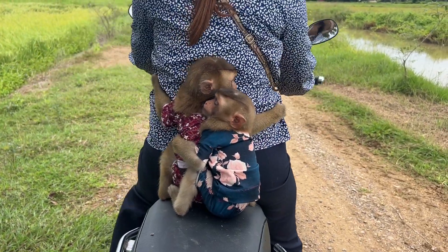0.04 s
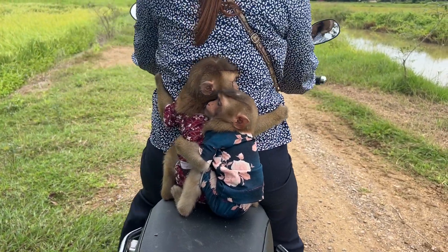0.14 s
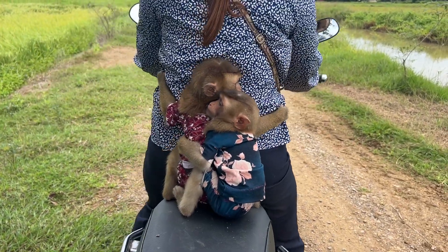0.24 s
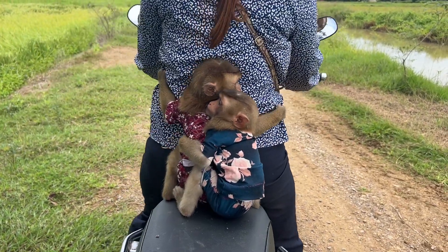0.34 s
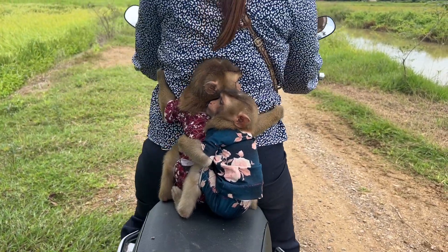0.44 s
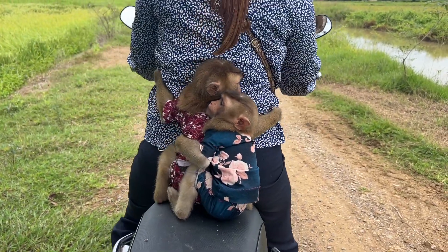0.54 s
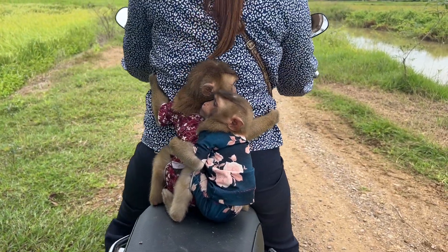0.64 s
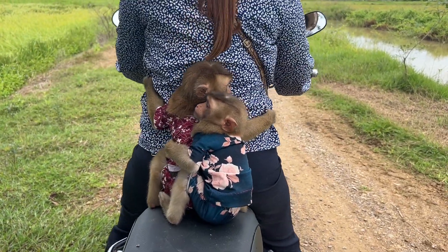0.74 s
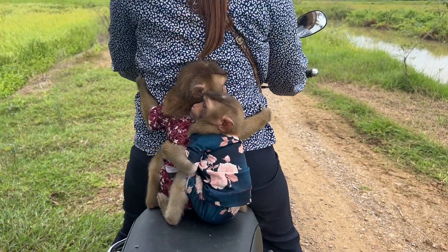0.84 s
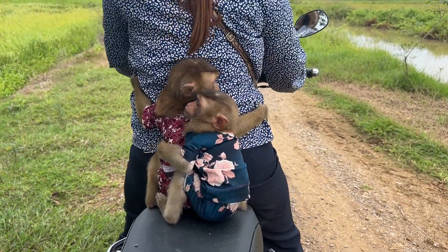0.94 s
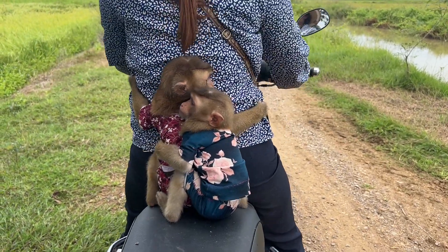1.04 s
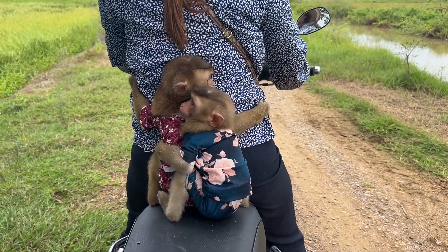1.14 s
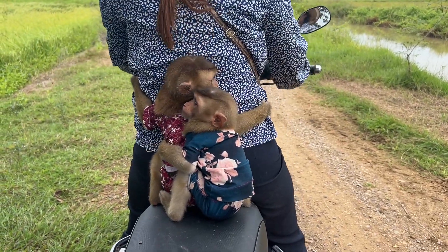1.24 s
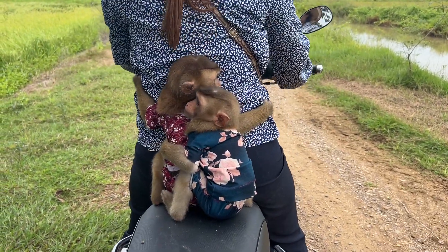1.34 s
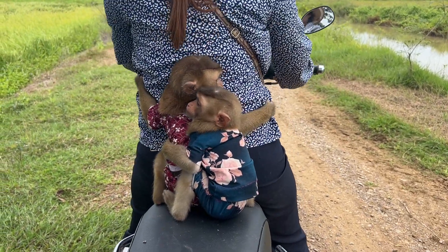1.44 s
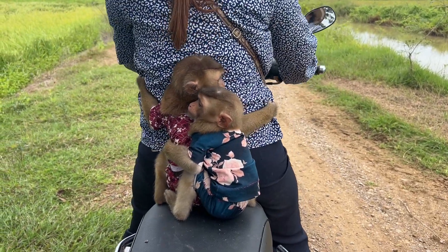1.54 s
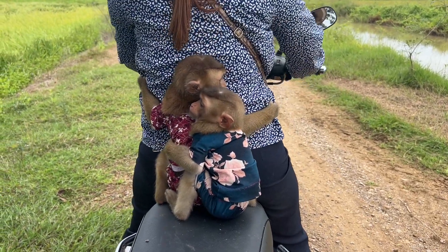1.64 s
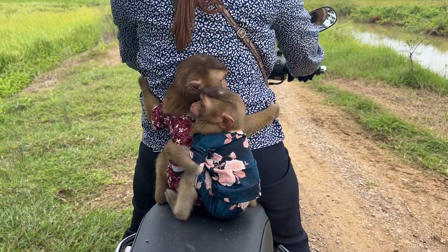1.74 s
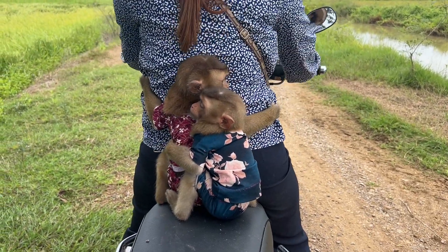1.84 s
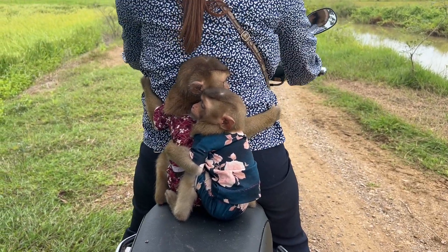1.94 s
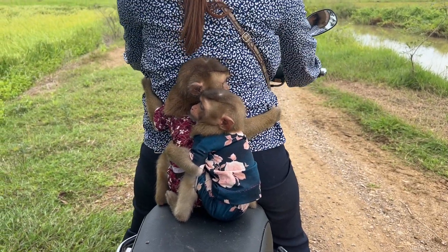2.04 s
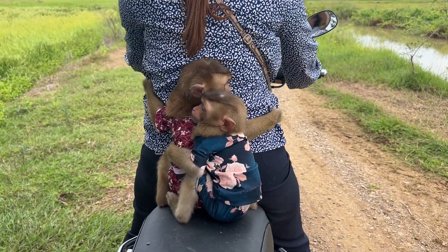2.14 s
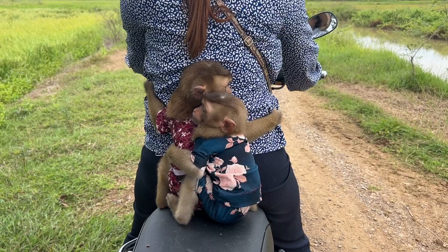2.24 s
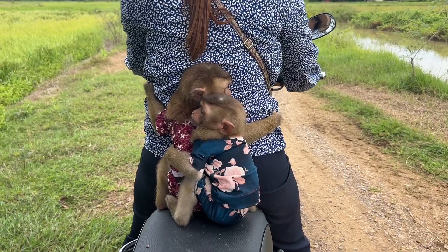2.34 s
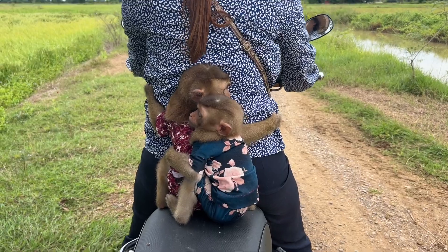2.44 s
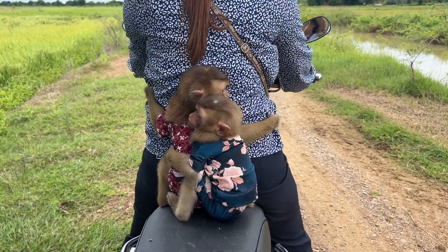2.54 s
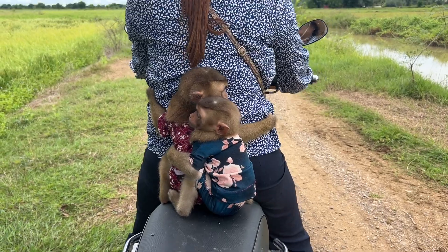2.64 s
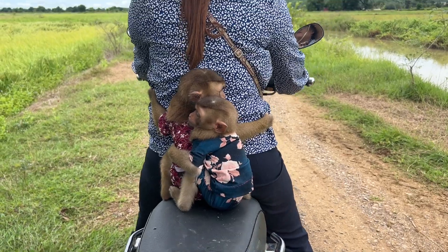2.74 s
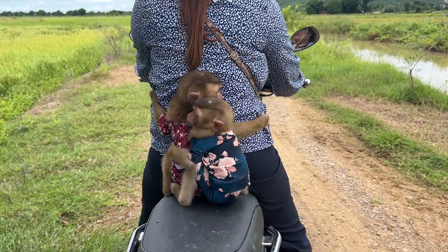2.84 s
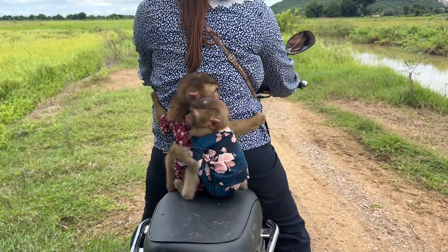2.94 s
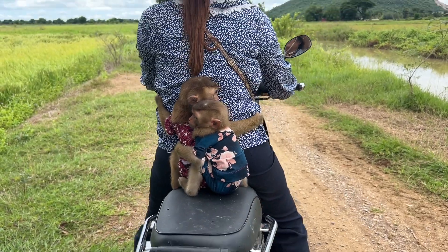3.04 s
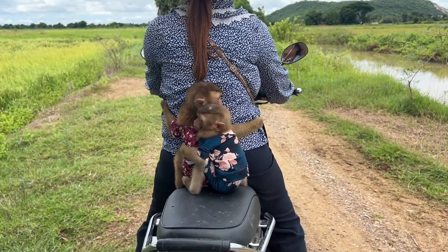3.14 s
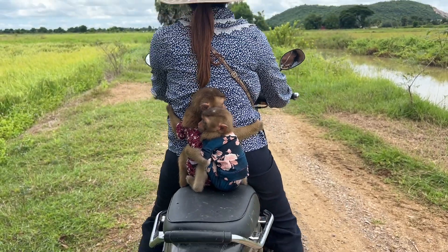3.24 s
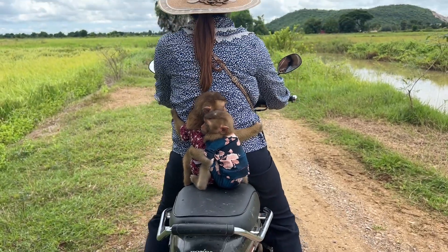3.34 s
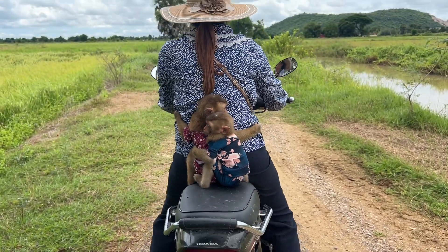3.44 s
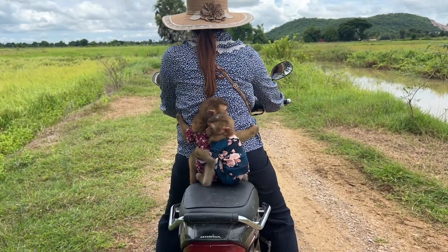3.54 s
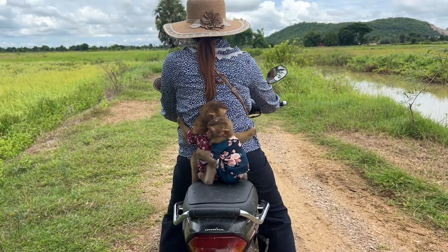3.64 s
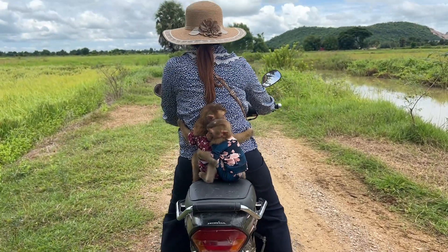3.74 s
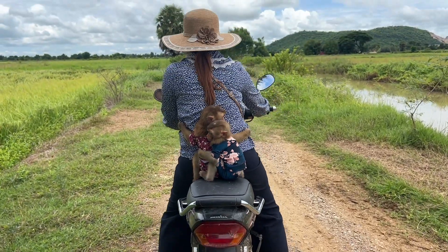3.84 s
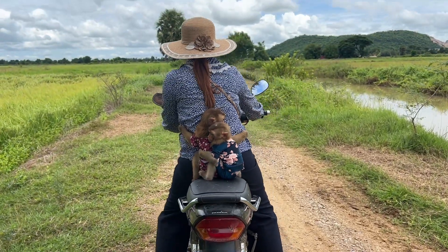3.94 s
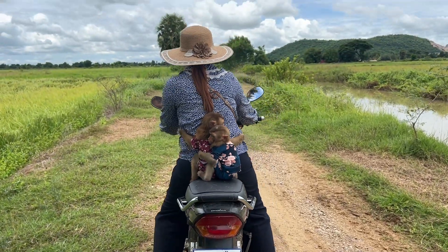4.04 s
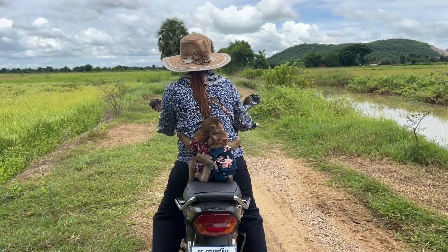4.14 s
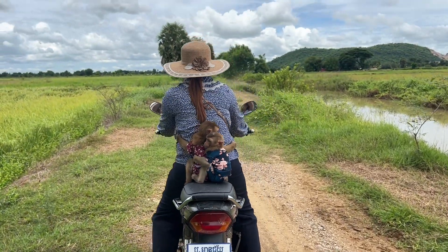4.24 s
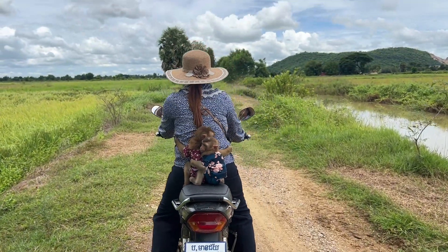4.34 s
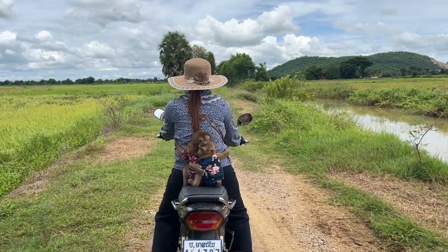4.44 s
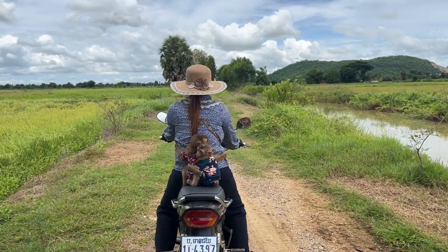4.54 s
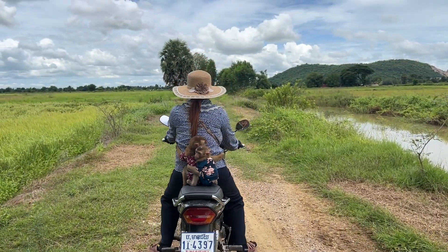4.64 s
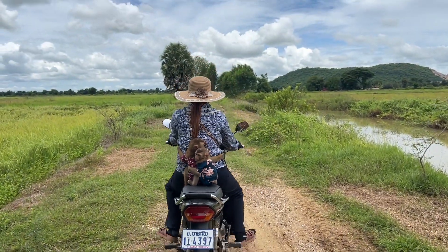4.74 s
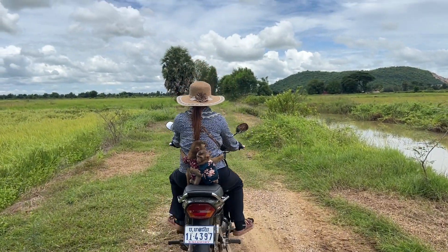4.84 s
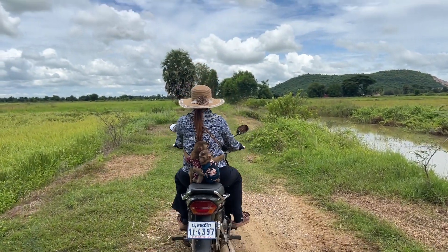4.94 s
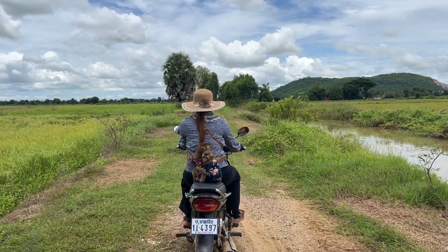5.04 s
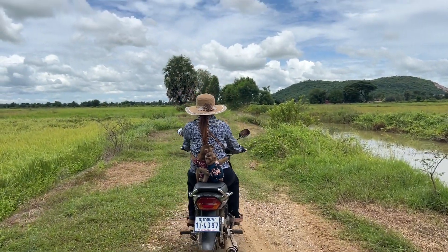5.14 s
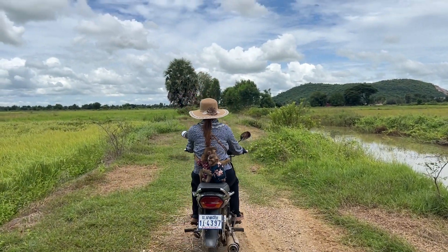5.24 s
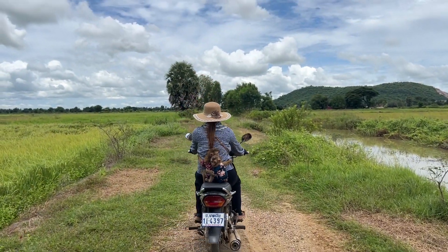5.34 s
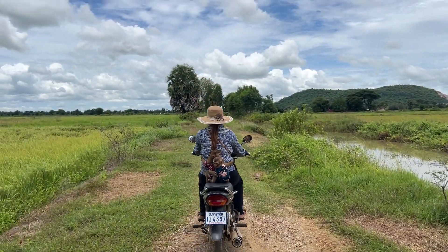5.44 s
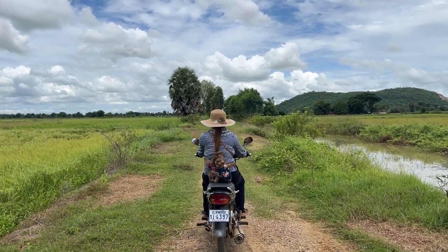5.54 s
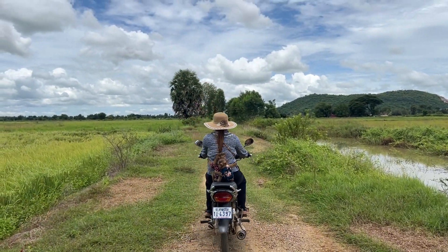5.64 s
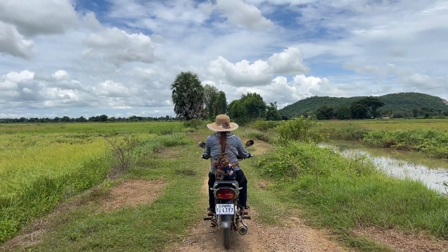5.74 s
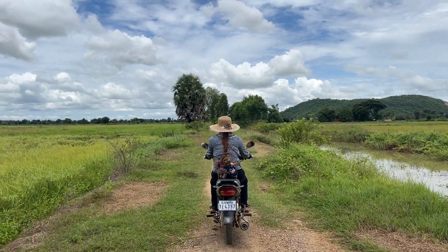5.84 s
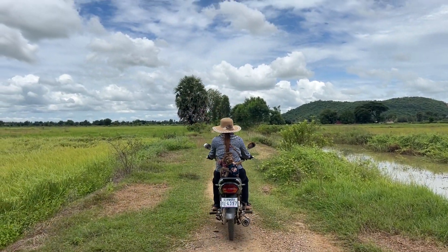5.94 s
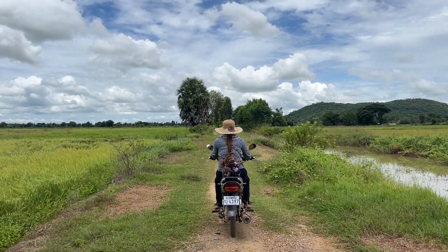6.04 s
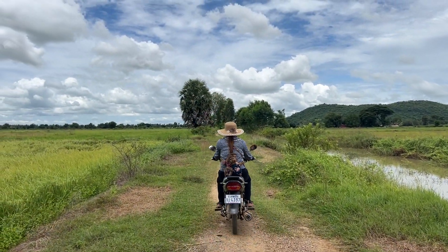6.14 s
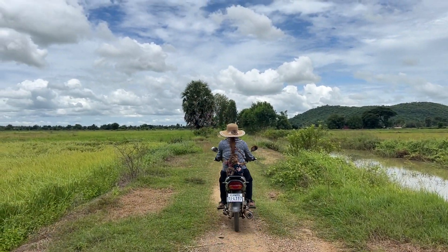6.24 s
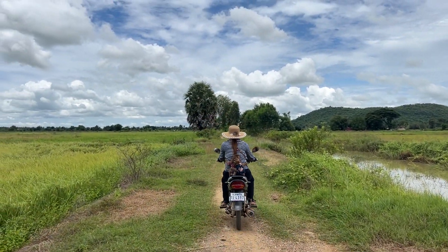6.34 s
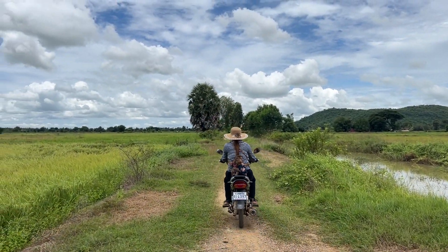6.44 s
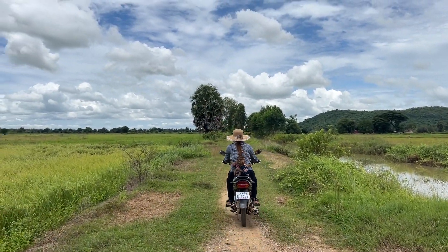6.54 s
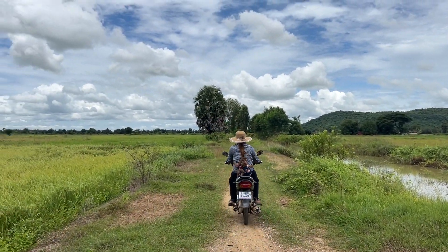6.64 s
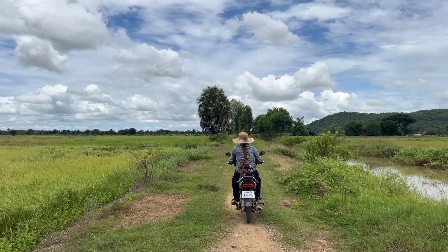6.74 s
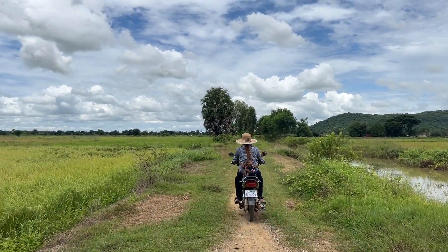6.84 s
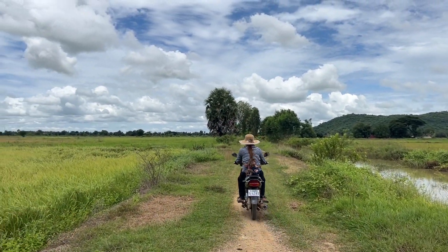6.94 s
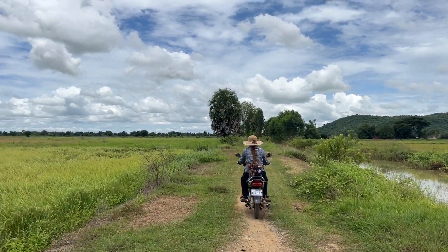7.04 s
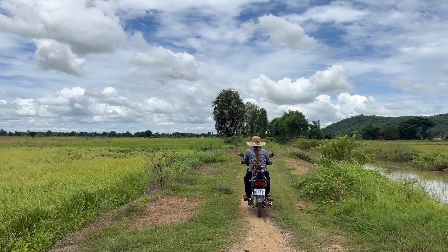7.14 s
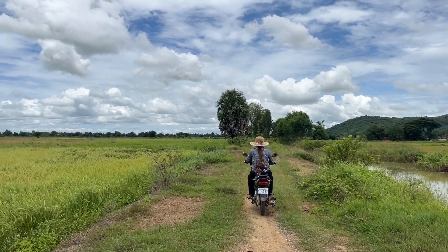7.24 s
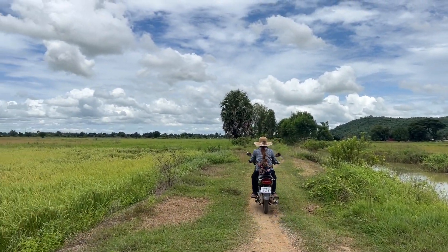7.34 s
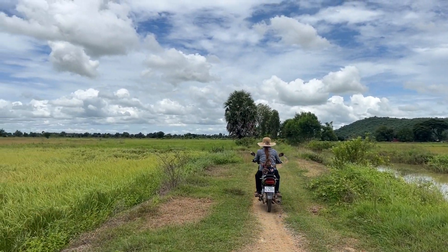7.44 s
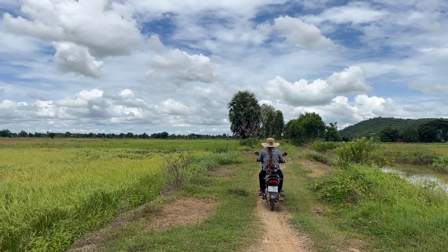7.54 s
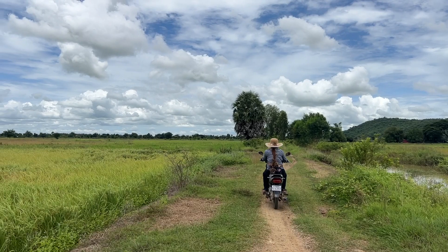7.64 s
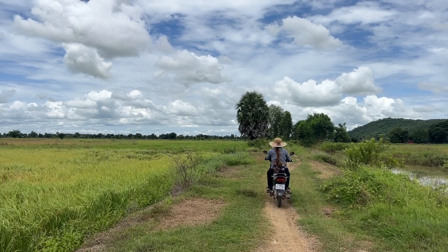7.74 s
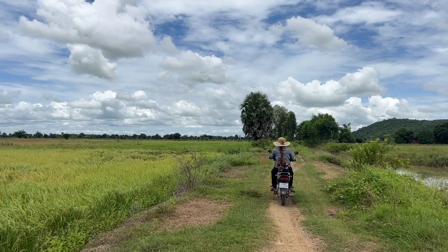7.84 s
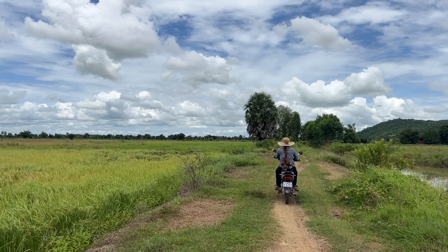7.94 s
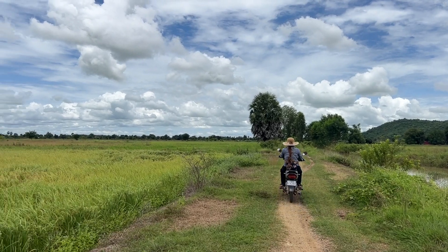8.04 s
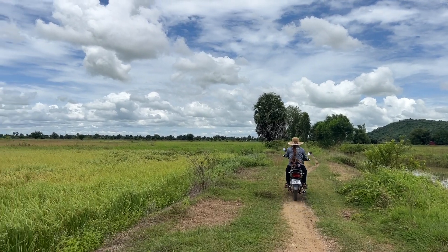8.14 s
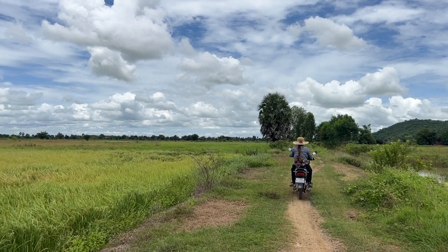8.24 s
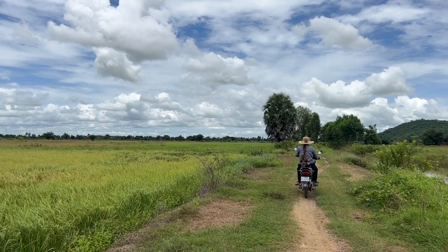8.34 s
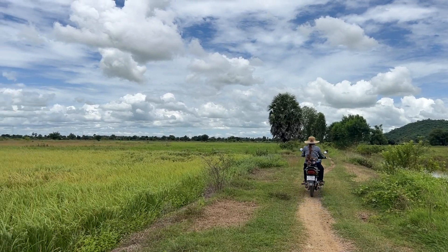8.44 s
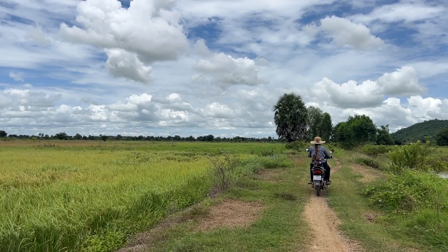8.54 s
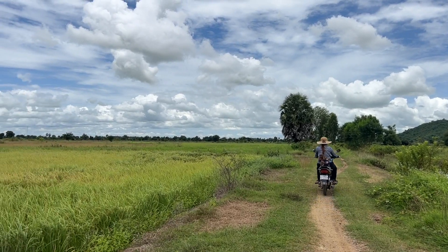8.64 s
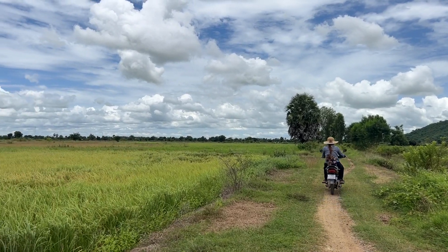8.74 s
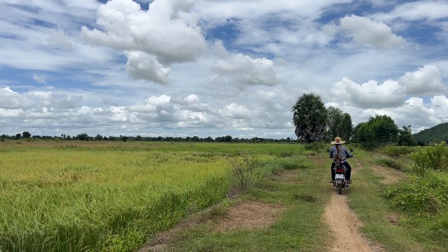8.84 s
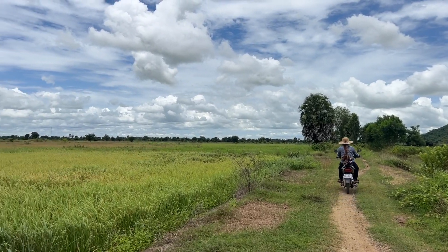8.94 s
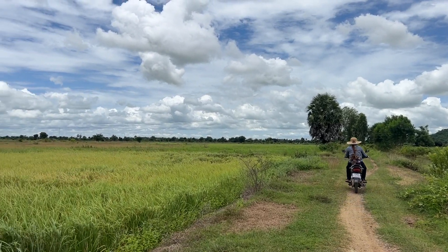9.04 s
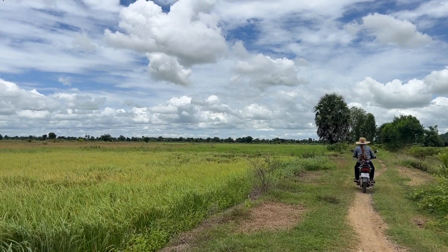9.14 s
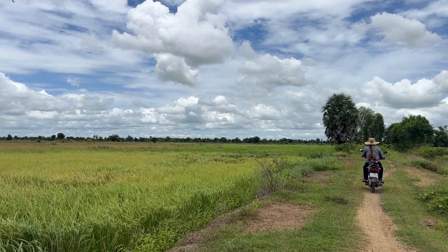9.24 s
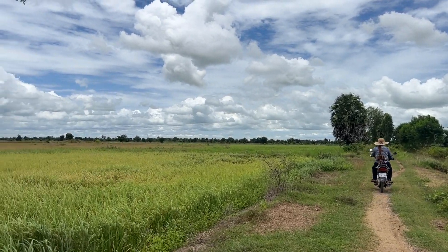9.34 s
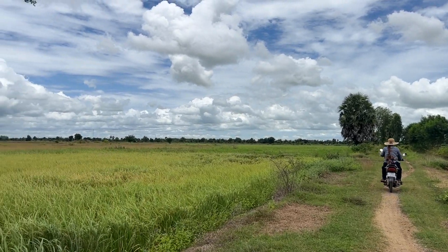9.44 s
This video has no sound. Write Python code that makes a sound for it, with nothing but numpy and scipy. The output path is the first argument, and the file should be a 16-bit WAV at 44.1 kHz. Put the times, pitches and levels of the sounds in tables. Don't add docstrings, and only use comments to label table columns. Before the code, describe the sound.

A rider shifts and knocks metal levers and stand, the seat creaks, and an electric starter grinds briefly. A small engine fires slowly, then speeds into a steady, low, rapid putter. Tyres crunch away over grit with ticks and clinks, the exhaust growing softer, duller and irregular as the throttle closes. Outdoors, dry and open without reverberation; a fixed microphone picks up low wind gusts, tiny high bird chips and a late muffled pop.

```python
import sys
import numpy as np
from scipy import signal
from scipy.fft import rfft, irfft, next_fast_len
from scipy.io import wavfile
from scipy.ndimage import uniform_filter1d

SR = 44100
rng = np.random.default_rng(int(sys.argv[2]) if len(sys.argv) > 2 else 0)


def nominal_scale(level):
    x = np.asarray(level, float) / 20
    return 10 ** x


def dump_mix(stems):
    frames = np.atleast_2d(stems).T
    limited = np.clip(frames, -1, 1)
    pcm = np.round(limited * 32767).astype(np.int16)
    wavfile.write(sys.argv[1], SR, pcm)


N = 418950
SECONDS = np.arange(N) / SR
SIZE = next_fast_len(N)
HZ = np.maximum(np.arange(SIZE // 2 + 1) * SR / SIZE, 1)

MISFIRES = [66, 68, 71, 76, 82, 108, 114, 118]
MISFIRE_LATE_S = .019
TIGHT_MS = 60


def rms_one(x):
    return x / np.sqrt(np.mean(x ** 2) + 1e-20)


def in_time(rows):
    s, *columns = np.transpose(rows)
    return [np.interp(SECONDS, s, c) for c in columns]


def during(rows):
    start, end = rows[0][0], rows[-1][0]
    return np.interp(SECONDS, [start, start + .008, end - .008, end], [0, 1, 1, 0])


def humps(rows):
    return sum(nominal_scale(db) * np.exp(-((SECONDS - s) / width) ** 2) for s, width, db in rows)


def at_hz(points):
    p = np.array(points, float)
    return np.interp(np.log(HZ), np.log(np.maximum(p[:, 0], 1)), p[:, 1])


def noise(spectrum, resonances=()):
    gain = 1 + sum(nominal_scale(db) / (1 + ((HZ - hz) / (width_hz / 2)) ** 2) for hz, width_hz, db in resonances)
    return rms_one(irfft(rfft(rng.standard_normal(SIZE)) * nominal_scale(at_hz(spectrum)) * gain, SIZE)[:N])


def drift(rate):
    r = np.exp(-2 * np.pi * rate / SR)
    return rms_one(signal.lfilter([1], [1, -2 * r, r * r], rng.standard_normal(N + SR))[SR:])


def split(x, hz):
    low = signal.sosfilt(signal.butter(1, hz, fs=SR, output="sos"), x)
    return low, x - low


def fields():
    # frequency in Hz, level in dB per Hz.
    colour = [(35, -36), (60, 17), (262, -2), (503, -15), (842, -20), (4120, -15), (10300, -61),
              (16000, -68)]
    return nominal_scale(-65) * (noise(colour) + 0.88 * noise(colour) * [[1], [-1]])


def wind():
    # time in s, level in dB.
    gusts = [(1.2, -60), (4.5, -40), (5.6, -46), (6.5, -46), (6.64, -42), (6.85, -47), (7.3, -52),
             (7.36, -36), (7.42, -48), (8.4, -52), (8.52, -41), (8.65, -53), (9.5, -60)]
    gust_db, = in_time(gusts)
    rumble = noise([(15, -46.0), (35, 3.0), (85, 2.0), (250, -10.5), (16000, -99)])
    return during(gusts) * nominal_scale(gust_db + 2.0 * drift(0.56)) * rumble


def birds():
    # time in s, peak in dB, frequency in Hz.
    chips = [
        (6.4457, -63, 7300),
        (6.5181, -62, 7400),
        (7.0694, -71, 7720),
        (7.9264, -81, 7540),
        (7.9833, -68, 7560),
        (8.647, -61, 7200),
        (8.7181, -58, 7200),
    ]
    out, t = np.zeros(N), np.arange(SR // 70) / SR
    for s, db, hz in chips:
        i = round((s - .004) * SR)
        whistle = np.sin(2 * np.pi * hz * (1.07 * t + .0007 * np.exp(-t / .004)))
        out[i:i + len(t)] += nominal_scale(db) * np.hanning(len(t)) * whistle
    return out


def grit():
    # time in s, level in dB.
    gravel = [(2.8, -69), (3.3, -56.5), (3.6, -60), (3.75, -57), (4.1, -62), (4.5, -62), (4.7, -63),
              (4.95, -61), (5.6, -68), (6.4, -75)]
    # time in s, peak in dB.
    ticks = [(2.2767, -47), (2.9412, -38), (3.2036, -52), (3.457, -42), (3.4624, -44), (3.9454, -33.5),
             (3.9549, -37), (4.2924, -38), (4.384, -41), (4.4836, -38), (4.5025, -36), (4.862, -38),
             (6.2233, -47), (6.2954, -61), (6.8578, -63), (6.8793, -61), (6.9486, -67), (6.989, -62),
             (7.0559, -55), (8.3419, -56), (8.63, -58), (8.7011, -58), (8.7585, -65), (9.1127, -62),
             (9.4195, -67)]
    grains_per_s, grain_t60_s = 610, 0.014
    gravel_db, = in_time(gravel)
    sizes = nominal_scale(2.5 * np.minimum(rng.exponential(1, N), 4))
    grains = rms_one(sizes * (rng.random(N) < grains_per_s / SR))
    marks = during(gravel) * nominal_scale(gravel_db) * grains / 12
    s, db = np.transpose(ticks)
    marks[(s * SR).astype(int)] += nominal_scale(db - 5.5)
    burst = signal.lfilter([1], [1, -nominal_scale(-60 / (grain_t60_s * SR))], marks)
    return burst * noise([(1500, -16), (4000, 2.5), (8000, -6.0), (12000, -5.5), (16000, -8.0)])


def strike(out, s, db, hz, edge_db, pan_db, t60, crunch, squeak):
    t, chance = np.arange(SR // 20) / SR, rng.standard_normal((2, SR // 20))
    body = signal.sosfilt(signal.butter(4, [550, 2400], "band", fs=SR, output="sos"), chance[0])
    edge = signal.sosfilt(signal.butter(2, [2200, 7500], "band", fs=SR, output="sos"), chance[1])
    ring = sum(squeak ** k * np.sin(2 * np.pi * (k + 1) * hz * t) for k in range(6))
    wave = ring + crunch * body + nominal_scale(edge_db + 6.5) * edge * np.exp(-t / 0.0023)
    wave = wave * nominal_scale(db - 60 * t / t60) * (1 - np.exp(-t / 0.00092))
    i = round(s * SR)
    out[:, i:i + len(t)] += wave[:N - i] * nominal_scale([[pan_db / 2], [-pan_db / 2]])


def blows():
    # time in s, peak in dB, ring in Hz, sharp edge in dB.
    taps = [(0.058, -61, 398, -26), (0.088, -41, 720, -30), (0.149, -59, 406, -14), (0.175, -23, 937, -11),
            (0.229, -22.5, 652, -17), (0.275, -21, 315, -16), (0.346, -28.5, 1620, -23),
            (0.377, -47, 875, -13), (0.417, -22, 1144, -11), (0.445, -27, 940, -2),
            (0.471, -29.5, 1060, -3), (0.497, -29.5, 1505, 1), (0.953, -45, 1930, -20),
            (0.856, -47, 1980, -12), (0.862, -39, 546, -25), (1.1, -43.5, 630, -27),
            (1.113, -42, 1940, -14)]
    knocks = [(2.669, -30, 1200, 3), (3.015, -31, 1430, 0), (3.112, -24.5, 1430, 3.5),
              (3.882, -31, 1070, -9), (4.109, -40, 1030, -30), (4.145, -30.5, 1070, -1),
              (4.241, -25.5, 964, -8), (4.35, -51, 1460, -15), (4.469, -56, 1180, 4), (5.26, -46, 1300, -5),
              (5.911, -40.5, 1740, -5), (5.99, -36.5, 960, -6), (6.021, -37.5, 1430, -4),
              (6.067, -31, 1350, -18.5), (6.125, -38, 1310, -11), (6.182, -40, 850, -7),
              (6.396, -44.5, 990, 7.5), (6.63, -44, 1040, -25), (6.674, -43, 2320, 3.5),
              (7.344, -44, 990, -2), (8.13, -60, 1510, 7), (8.136, -51, 1120, 1), (8.328, -46, 920, -30),
              (8.34, -47, 900, -30), (8.36, -50, 1130, -21), (8.403, -47.5, 870, 7.5),
              (8.414, -48.5, 969, 1), (8.435, -48, 1060, -10), (8.588, -45, 1010, -15),
              (8.908, -41.5, 1020, -24), (9.261, -65, 1200, -11), (9.469, -55.5, 1030, 10)]
    jolt = [
        (4.918, -32, 1310, -1),
        (4.947, -27, 1100, -16),
        (4.955, -26.5, 1300, -12),
        (4.958, -31, 975, -7),
        (5.021, -31.5, 1230, -20),
        (5.071, -34.5, 1310, -15),
    ]
    # time in s, peak in dB, ring in Hz.
    chatter = [
        (5.9344, -51, 1530),
        (5.9594, -50, 1240),
        (6.0506, -45, 1900),
        (6.0547, -40, 1360),
        (6.085, -39, 1460),
        (6.0998, -34, 1270),
        (6.144, -43, 1220),
        (6.151, -39, 1300),
    ]
    for s, db, hz, edge_db in taps:
        if s == taps[0][0]:
            out = np.zeros((2, N))
        strike(out, s, db - 12.5, hz, edge_db, 0, t60=0.046, crunch=1.0, squeak=0.29)
    drifting = knocks + [(s, db - 6, hz, -12) for s, db, hz in chatter]
    placed = [(*k, 3.5 - 0.8 * k[0]) for k in drifting]
    placed = placed + [(*k, -5.5) for k in jolt]
    for s, db, hz, edge_db, pan_db in placed:
        strike(out, s, db - 3, hz, edge_db, pan_db, t60=.045, crunch=2.6, squeak=.1)
    return out


def rider():
    # time in s, unused.
    seated = [(0, 0), (1.19, 0)]
    # time in s, half-width in s, rustle in dB, fizz against rustle in dB.
    shifts = [(.005, 0.031, -52, -30), (.195, 0.033, -60, -27), (0.271, 0.049, -46.5, 1.5),
              (.375, 0.033, -44, -14), (.46, 0.031, -51, -9), (.53, 0.017, -55.5, -9),
              (.7, 0.032, -53, -32), (.79, 0.042, -63, 7), (.9, 0.038, -67, -27)]
    # time in s, half-width in s, level in dB.
    thuds = [(.01, .03, -80), (.195, 0.03, -51), (.26, 0.029, -63), (.41, 0.018, -71), (.59, 0.013, -49),
             (.65, 0.019, -51), (.78, .05, -62), (1.07, 0.026, -50), (1.15, .05, -80)]
    # time in s, pitch in Hz, level in dB.
    squeak = [
        (0.655, 835, -58),
        (0.7, 852, -50.5),
        (0.74, 836, -50),
        (0.775, 832, -59),
        (0.83, 826, -75),
    ]
    rest_db, rest_bright_db = -66.5, -11
    rub = nominal_scale(rest_db) + humps([(s, w, db) for s, w, db, _ in shifts])
    bright = nominal_scale(rest_db + rest_bright_db) + humps([(s, w, db + fizz_db) for s, w, db, fizz_db in shifts])
    cloth = noise([(100, -6.5), (300, 0.5), (1000, -6.5), (3000, -23.0), (16000, -49)])
    fizz = noise([(1500, 6.5), (4000, 0.0), (9000, 0.5), (16000, -7)])
    rustle = nominal_scale(3.0 * drift(105) - 3.5) * (rub * cloth + bright * fizz)
    bumps = humps(thuds) * noise([(20, -26), (60, 10.0), (150, -7.0), (400, -34), (16000, -87)])
    hz, creak_db = in_time(squeak)
    turn = 2 * np.pi * np.cumsum(hz * (1 + 0.0165 * drift(110))) / SR
    creak = 1.5 * np.sin(turn) + 0.4 * np.sin(2 * turn) + 0.16 * np.sin(4 * turn)
    creak = nominal_scale(creak_db + 1.4 * drift(150)) * creak
    return during(seated) * (rustle + bumps) + during(squeak) * creak


def starter():
    # time in s, level in dB.
    whirring = [(1.175, -73), (1.19, -40), (1.26, -30), (1.31, -35), (1.333, -25), (1.355, -37),
                (1.55, -35.5), (1.8, -42), (2.3, -52)]
    # frequency in Hz, level in dB per Hz.
    colour = [(120, -30), (200, -8), (867, 0.5), (1020, -3.5), (1940, -3.5), (10100, -30.5), (12200, -53),
              (13800, -55), (16000, -49)]
    # frequency in Hz, width in Hz, level in dB.
    casing = [(1440, 130, 6), (1930, 125, 10.5), (2160, 60, 11.5), (2460, 73, -16), (3285, 63, 11),
              (4130, 940, 10.5), (6940, 83, 21), (8340, 1400, 11.5)]
    # time in s, half-width in s, upper whine in dB, lower whine in dB.
    strains = [
        (1.246, 0.027, -44, -21),
        (1.331, 0.024, -28, -26),
        (1.355, 0.01, -51, -29),
    ]
    whirr_db, = in_time(whirring)
    whirr = nominal_scale(whirr_db - 3.0 + 2.0 * drift(42)) * noise(colour, casing)
    upper = humps([(s, w, db) for s, w, db, _ in strains]) + nominal_scale(whirr_db - 10)
    upper_tones = [(1310, 50, 26), (1431, 23, 37.2), (2575, 36, 26.6), (3640, 160, 9.7), (4970, 260, 5.2)]
    upper = upper * noise([(100, -38), (16000, -43.0)], upper_tones)
    pace = np.clip(1 + 2.55 * (SECONDS - strains[0][0]), .92, 1.08)
    tone = noise([(100, -44), (16000, -48)], [(801, 110, 110)])
    lower = np.interp(np.cumsum(pace), np.arange(N), tone)
    lower = humps([(s, w, db - 10.5) for s, w, _, db in strains]) * lower
    return during(whirring) * (whirr + upper + lower)


def every_firing():
    # firing number, ms to the next firing, full-charge thump peak in dB.
    catching = [
        (0, 83.07, -6.8),
        (3, 110.63, -8.2),
        (4, 112.4, -9.7),
        (5, 113.3, -11.2),
        (6, 101.6, -11.6),
        (7, 96.0, -9.9),
        (8, 73.54, -7.3),
        (9, 64.53, -6.3),
        (11, 59.71, -6.5),
    ]
    riding = [(17, 56.88, -6.8), (20, 62.8, -8.2), (25, 64.05, -9.3), (28, 64.14, -9.3), (52, 56.89, -14.0),
              (64, 55.24, -17.4), (68, 68.56, -24.4), (70, 75.49, -21.7), (86, 70.37, -23.6),
              (89, 54.77, -20.9), (95, 54.24, -24.4), (96, 59.08, -25.3), (107, 81.21, -28.8),
              (117, 83.89, -30.7), (119, 75.41, -31.2)]
    # firing number, shortfall in dB, slackness.
    weak_charges = [(1, 5.6, 1.53), (2, 4.4, 1.35), (3, 4.5, 1.39), (5, 1.7, 1.4), (66, 7.1, 1.59),
                    (67, 4.7, 1.39), (68, 4.2, 1.6), (70, 5.8, 1.47), (71, 10.8, 1.5), (73, 4.9, 1.6),
                    (76, 8.8, 1.48), (78, 5.1, 1.6), (79, -0.4, 1.45), (80, 2.3, 1.57), (82, 12.7, 1.54),
                    (84, 5.0, 1.43), (85, 7.9, 1.47),
                    (99, 5.2, 1.35), (100, 0.2, 1.33), (101, 7.6, 0.96), (102, 2.0, 1.4), (103, -0.9, 1.6),
                 (104, 3.8, 1.39), (106, 4.3, 1.6), (108, 3.6, 1.59), (110, 3.5, 1.02), (112, 4.4, 1.12),
                 (114, 12.1, 1.52), (116, 6.2, 1.09), (118, 8.0, 1.41)]
    number, ms, db = np.transpose(catching + riding)
    count = np.arange(120)
    ms, full = np.interp(count, number, ms), np.interp(count, number, db)
    s = 1.3648 + (np.cumsum(ms) - ms) / 1000 + MISFIRE_LATE_S * np.isin(count, MISFIRES)
    peak = full.copy()
    slack = np.minimum(1 + .0058 * (ms - TIGHT_MS), 1.22)
    for k, short_db, weak in weak_charges:
        peak[int(k)], slack[int(k)] = full[int(k)] - short_db, weak
    return np.transpose([s, ms, full, peak, slack])


def per_firing(shape, follow, uneven_db):
    rows, marks = every_firing(), np.zeros(N)
    strength = rows[:, 3] - uniform_filter1d(rows[:, 3], size=7)
    gains = nominal_scale(follow * strength + uneven_db * rng.standard_normal(len(rows)))
    marks[np.round(rows[:, 0] * SR).astype(int)] = gains
    envelope = signal.fftconvolve(marks, shape)[:N]
    return envelope / np.sqrt(uniform_filter1d(envelope ** 2, size=SR // 3) + 1e-4)


def engine_noise():
    # time in s, level in dB.
    jet_level = [(1.3, -44.5), (1.6, -49.5), (2.1, -52), (2.3, -42), (2.75, -45.5), (2.95, -52.5),
                 (4.0, -55.5), (5.0, -56), (5.55, -60.5), (5.75, -75), (7.05, -86), (7.2, -80), (7.55, -65),
                 (7.8, -95), (9.5, -97)]
    # frequency in Hz, level in dB per Hz.
    puff_colour = [(150, -26), (400, -29), (1000, -15), (2000, -6.5), (4000, -28), (8000, -10),
                   (12000, -18.5), (16000, -18)]
    # frequency in Hz, width in Hz, level in dB.
    pipe = [(2344, 120, 13), (3750, 280, 21.5), (5150, 1300, 6), (8700, 1000, -14)]
    # frequency in Hz, level in dB per Hz.
    gear_colour = [(120, -6.5), (220, 3), (400, -9), (650, -8), (870, -11), (1900, -19.5), (2170, -21.5),
                   (8360, -38.5), (10200, -41), (11700, -39.5), (16000, -43)]
    # frequency in Hz, width in Hz, level in dB.
    casing = [(777, 22, 0), (871, 29, 3.5), (1220, 370, -5.5), (1430, 26, -22), (1870, 170, -0.5)]
    shield = [(2407, 47, 52.5), (3510, 530, 48), (4840, 800, 51.5)]
    ms, full_db = in_time(every_firing()[:, :3])
    (puff_db,) = in_time(jet_level)
    gear_db = -34 + 0.67 * full_db - 0.71 * 20 * np.log10(ms / TIGHT_MS)
    bright_db = 2.5 + 0.27 * full_db
    rattle_db = gear_db - 19 + 0.03 * full_db
    rattle_db = rattle_db - 31 * np.maximum(SECONDS - 8.4, 0)

    t = np.arange(SR // 12) / SR
    echo = 0.06 * np.exp(-((t - .011) / 0.00073) ** 2)
    puff = (1 - np.exp(-t / .0007)) * (np.exp(-t / .003) + .16 * np.exp(-t / .016)) + echo
    jet = per_firing(puff, follow=.6, uneven_db=2.5)
    jet = np.roll(jet, -round(0.0012 * SR))
    jet = nominal_scale(puff_db - 3.5) * jet * noise(puff_colour, pipe)

    shake = per_firing(t / .006 * np.exp(-t / .006), follow=.3, uneven_db=2.0)
    gear = nominal_scale(gear_db + 2.0 * drift(40)) * (.85 + .45 * shake) * noise(gear_colour, casing)
    hum_db = gear_db - .5 + .75 * full_db - 0.11 * (ms - TIGHT_MS)
    hum = nominal_scale(hum_db) * noise([(100, 0), (16000, 0)], [(850, 86, 90)])
    low, high = split(gear + hum + jet, 1400)
    rattle = noise([(100, -19), (5200, -28), (7000, -48), (16000, -50.5)], shield)
    rattle = nominal_scale(rattle_db) * shake * rattle
    running = np.interp(SECONDS, [1.33, 1.37], [0, 1])
    return running * (low + nominal_scale(bright_db) * high + rattle)


def thump(slack, size=8192):
    # frequency in Hz, sharpness.
    silencer = [(70, 7.0), (88, 3.2), (110, 2.6), (136, 3.4), (222, 6.0)]
    hz = np.arange(size // 2 + 1) * SR / size
    response = hz ** 4 + 0j
    for chamber_hz, sharp in silencer:
        u = 1j * hz * slack / chamber_hz
        response = response / (1 + u / sharp + u * u)
    wave = irfft(response)
    return wave / np.abs(wave).max()


def valve_kick(size=8192):
    t = np.arange(size) / SR
    swing = np.sin(2 * np.pi * (50 * t + .82 * (1 - np.exp(-t / .007))))
    return -1.15 * (1 - np.exp(-t / .0015)) * np.exp(-(t / .027) ** 2) * swing


def exhaust():
    # frequency in Hz, level in dB, t60 in s.
    boom_note = (58.2, -9.5, 0.08)
    # frequency in Hz, level in dB, t60 in s.
    tailpipe = [(205, -12.5, 0.068), (285, -28, 0.16), (335, -26, 0.13), (457.3, -28.5, 0.17),
                (537.6, -19, 0.075), (846.4, -42, 0.25)]
    # firing number, ms late.
    lean = [(67, 4), (70, 5), (72, -3), (73, -2), (76, 4), (77, 2), (79, 5), (84, 4), (85, 3), (99, 5),
            (100, 6), (101, -5), (102, 4), (104, 6)]
    # time in s, peak in dB, slackness.
    afterburn = (8.478, -31, 1.64)
    ring_lead_s, ring_rise_s = 0.005127, 0.0044
    out, kick, rows, late_ms = np.zeros(N + SR), valve_kick(), every_firing(), dict(lean)
    t = np.arange(len(kick)) / SR

    def leave(s, wave):
        out[round(s * SR):][:len(t)] += wave

    for number, (s, ms, full_db, db, slack) in enumerate(rows):
        late, hard, _, *uneven = rng.standard_normal(4 + len(tailpipe))
        kick_db = np.interp(slack, [1.04, 1.1], [-30, -9]) - .08 * (ms - 70) + 1.3 * hard
        shut = s - MISFIRE_LATE_S * (number in MISFIRES) + .3 * rows[max(number - 1, 0), 1] / 1000
        shut = shut + .006 + .0008 * late
        warm = (slack ** .4 * min(ms / TIGHT_MS, 1.15)) ** -0.41
        notes = []
        for (hz, ring_db, t60), u in zip([boom_note] + tailpipe, uneven):
            decay = nominal_scale(db + ring_db + 0.38 * u - 60 * t / t60)
            notes.append(slack * decay * np.sin(2 * np.pi * hz * warm * t) * (1 - np.exp(-t / ring_rise_s)))
        boom, *rings = notes
        rings_gain = (TIGHT_MS / ms) ** 2 * nominal_scale(1.1 * (full_db - db))
        s = s + late_ms.get(number, 0) / 1000
        leave(s, nominal_scale(db) * thump(slack) + boom)
        leave(s - ring_lead_s, sum(rings) * rings_gain)
        leave(shut, nominal_scale(full_db + kick_db) * kick)
    s, db, slack = afterburn
    leave(s, nominal_scale(db) * thump(slack))
    return out[:N]


def ports(x):
    # frequency in Hz, phase by which left leads in radians.
    port_phase = [(0, 0), (3700, 0.9), (4050, 1.7), (5860, -0.6), (7410, 1.1), (7920, 0.8), (9820, -2.6),
                  (10900, -4.0), (11700, -6.2), (12600, -6.6), (13300, -9.0), (14100, -9.6), (15200, -12.4),
                  (16500, -12.7)]
    # frequency in Hz, left over right in dB.
    balance = [(60, -.1), (300, -.7), (1200, .8), (2400, 1.3), (4400, 4.5), (8000, 0)]
    # frequency in Hz, left-right likeness from 0 to 1.
    likeness = [(150, .996), (400, .99), (1000, .9), (2000, .85), (4000, .7), (8000, .85), (10000, .97)]
    half = nominal_scale(at_hz(balance) / 2) * np.exp(.5j * np.interp(HZ, *np.transpose(port_phase)))
    x = x * np.ones((2, 1))
    scattered = rfft(np.roll(x.mean(axis=0), 60) * drift(15.6), SIZE)
    scattered = scattered * 0.9 * np.sqrt(1 - np.clip(at_hz(likeness), 0, 1))
    left, right = rfft(x, SIZE)
    return irfft([(left + scattered) * half, (right - scattered) / half], SIZE)[:, :N]


def scene():
    around = wind() + birds() + grit() + blows()
    motorcycle = rider() + starter() + engine_noise() + exhaust()
    return ports(around + motorcycle) + fields()


def low_pass(x):
    return signal.sosfilt(signal.butter(12, 16960, fs=SR, output="sos"), x)


def record(dry):
    band = signal.sosfilt(signal.cheby2(10, 60, 17300, fs=SR, output="sos"), dry)
    band = band - signal.sosfilt(signal.butter(1, 14, fs=SR, output="sos"), band)
    return low_pass(band)


dry = scene()
out = record(dry)
dump_mix(out)
```